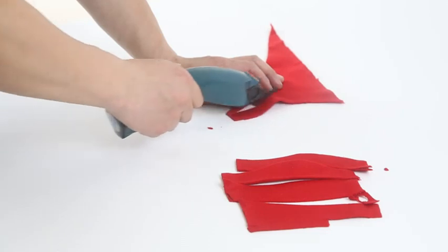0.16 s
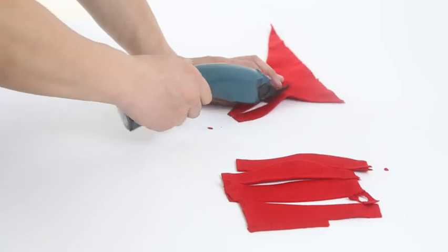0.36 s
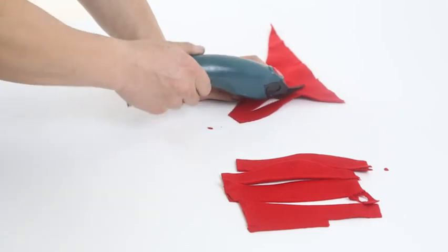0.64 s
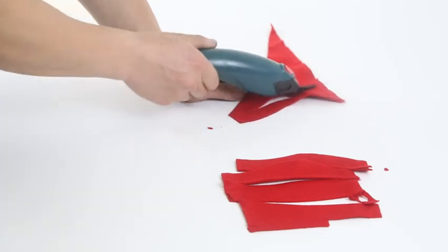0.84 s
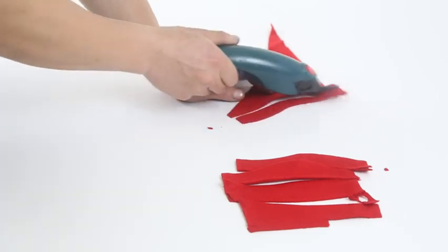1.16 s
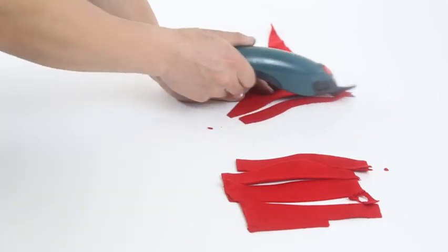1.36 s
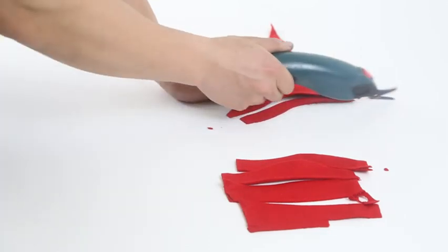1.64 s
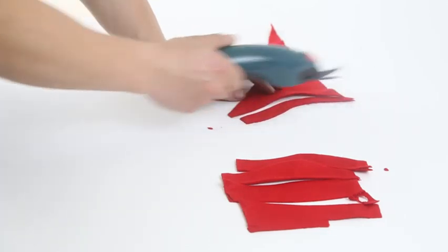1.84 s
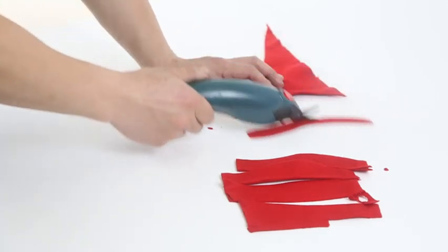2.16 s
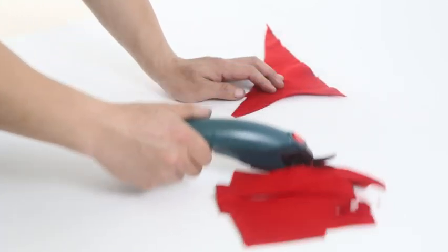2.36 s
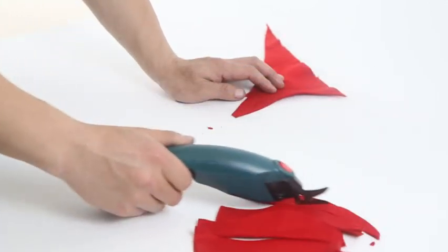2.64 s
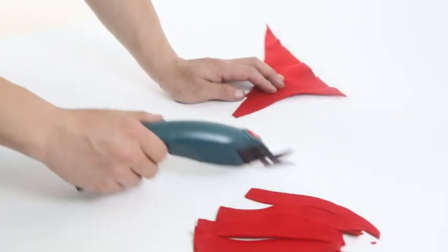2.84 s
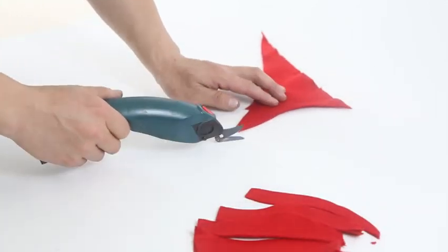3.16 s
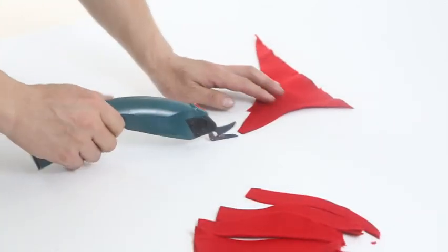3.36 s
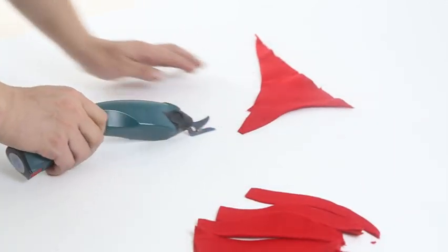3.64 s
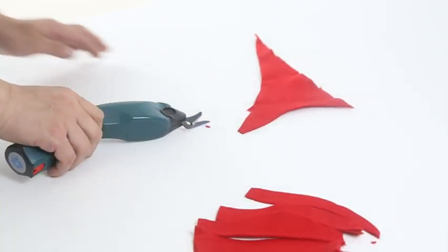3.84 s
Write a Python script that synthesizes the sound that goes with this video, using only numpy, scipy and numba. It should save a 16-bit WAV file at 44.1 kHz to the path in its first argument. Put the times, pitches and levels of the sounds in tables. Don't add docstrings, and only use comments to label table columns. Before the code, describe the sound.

Electric scissors buzz harshly while cutting cloth on a table, then wind down to quiet.

```python
import sys
import numpy as np
from scipy import signal
from scipy.fft import rfft, irfft
from scipy.io import wavfile
from scipy.ndimage import uniform_filter1d
from numba import njit

SR = 44100
rng = np.random.default_rng(int(sys.argv[2]) if len(sys.argv) > 2 else 0)


def put_to_file(sound):
    columns = np.atleast_2d(sound).T
    safe = np.clip(columns, -1, 1)
    whole_steps = np.round(safe * 32767)
    wavfile.write(sys.argv[1], SR, whole_steps.astype(np.int16))


def volts_from_db(level):
    exponent = np.asarray(level, float) / 20
    return 10 ** exponent


N = 176400

# (time [s], speed [strokes/s])
STROKE_SPEED = [(0.0, 59.75), (0.5, 59.96), (0.9, 60.15), (1.2, 59.7), (1.45, 60.1), (1.55, 60.51),
                (1.92, 61.08), (2.0, 50.4), (2.1, 36.42), (2.2, 24.63), (2.3, 15.97), (2.5, 1.15)]
# (time [s], level [dB], brightness [dB])
TOOL_MOVES = [(0, -21, -7.5), (.26, -22, -8.5), (.49, -24.5, -7), (.63, -21.5, -9), (1.17, -22.5, -6.5),
              (1.46, -22, -9), (1.56, -24.5, 2), (1.75, -26.5, 4), (1.95, -24, 3), (2.1, -24.5, 2.5),
              (2.3, -29.5, 1)]
# (time [s], hum level [dB])
TABLE_PRESS = [(0.0, -32), (0.046, -29.5), (0.582, -33), (1.178, -34.5), (1.5, -43), (1.618, -47),
               (1.662, -60), (1.7, -62)]
# (multiple of stroke rate [-], early level [dB], late level [dB])
TABLE_HUM = [(1, -27, -34), (2, 0.5, 0.5), (3, -8.5, -7.5), (4, -19.5, -32), (5, -15.5, -18.5),
             (6, -25, -23)]
# (multiple of stroke rate [-], first grip [dB], second grip [dB], third grip [dB])
BLADE_TONES = [(6.97, -50, -49, -50.5), (7.94, -52, -48.5, -49), (9.07, -48.5, -43.5, -43),
               (10.23, -68, -50, -48.5), (11.38, -64, -62, -57), (11.97, -46, -43.5, -42),
               (12.7, -51, -55, -44), (14.07, -42, -35, -36), (15.03, -38, -37.5, -34),
               (15.94, -40, -39, -49), (17.05, -36.5, -45.5, -36), (17.9, -49, -50, -49),
               (18.85, -38, -36.5, -34.5), (20, -40, -52, -44), (20.78, -35.5, -38.5, -36.5),
               (21.92, -32, -57, -45), (22.96, -38, -35.5, -31), (24.12, -34, -32.5, -30.5),
               (24.86, -40, -53, -41), (26.12, -41, -41, -35), (26.66, -36, -37, -47),
               (28.14, -58, -63, -37), (29.35, -40, -44, -39), (30, -45, -49, -40), (31.5, -37, -52, -36.5),
               (32, -47, -53, -37.5), (33, -44, -52, -49), (35.15, -38, -51, -40), (35, -40, -42, -41),
               (35, -46, -47, -51), (36.64, -35, -43, -44), (38.45, -38, -40, -37), (39.17, -34, -53, -34),
               (40.55, -32, -37, -45), (41, -43, -39, -36.5), (41.86, -34, -38, -51), (42.8, -44, -38, -49),
               (45.1, -52, -46, -50), (43.9, -48, -43, -42)]
# (pitch [Hz], width [Hz], level [dB])
HOUSING_CUTTING = [(543, 43, -14), (893, 115, -7), (1060, 143, -5.5), (1350, 152, -2.5), (1623, 166, -1.5),
                   (2400, 464, 0.5), (3170, 680, -0.5), (3900, 720, -1.5), (6260, 730, -11),
                   (7400, 620, -7), (9900, 1900, -10.5), (13000, 5000, -18)]
# (pitch [Hz], width [Hz], level [dB])
HOUSING_FREE = [(624, 600, -11.5), (1140, 300, 0), (1650, 290, -3), (2116, 590, -1.6), (2624, 470, 0.5),
                (3094, 400, -2), (3900, 1140, -5), (5280, 3000, -12.5), (6900, 1600, -12.5),
                (8800, 970, -17.5), (10400, 1500, -18), (13500, 5600, -29)]
# (pitch [Hz], width [Hz], level [dB])
STEEL_IN_CLOTH = [(4230, 1500, -5), (6340, 2400, -4.5), (9260, 1540, 5), (11000, 2700, -7),
                  (13400, 2700, -25)]
# (pitch [Hz], width [Hz], level [dB])
STEEL_IN_AIR = [(4240, 880, 4.5), (6500, 2300, 1), (9000, 2500, -10), (12400, 2800, -10)]
# (time [s], peak [dB], pitch [Hz], length [s])
HAND_TICKS = [(3.08, -50, 6000, .004), (3.383, -48, 2500, .003), (3.413, -40, 3000, .004),
              (3.441, -34, 2700, .002), (3.442, -40, 4200, .002), (3.465, -33, 2400, .002),
              (3.54, -41, 7000, .0015), (3.55, -38, 3470, 0.0053), (3.603, -33, 3200, .0018),
              (3.603, -45, 8000, 0.0011), (3.623, -27, 2500, 0.0034), (3.947, -34, 3900, 0.0038),
              (3.942, -44, 13000, .004), (3.945, -32, 9500, 0.0039), (3.946, -40, 7000, 0.0032)]
# (centre time [s], length [s], level [dB], pitch [Hz])
CLOTH_RUSTLE = [(3.13, 0.15, -59, 8981), (3.66, 0.16, -55, 5200), (3.69, 0.12, -58, 5700),
                (2.54, 0.11, -54, 9000), (3.67, 0.044, -50, 2500), (3.8, 0.072, -46.5, 450),
                (3.88, 0.092, -56, 6574)]
# (time [s], peak [dB])
SET_DOWN = [
    (3.621, -29.5),
    (3.717, -19.5),
    (3.726, -19),
    (3.734, -19),
    (3.761, -25),
    (3.793, -22),
    (3.809, -31),
    (3.825, -34),
    (3.869, -38),
    (3.933, -44),
]
# (pitch [Hz], level [dB], time to fade by 60 dB [s])
TABLE_RING = [(147, -2, 0.12), (224, -6.5, 0.13), (301, 6, 0.091), (360, -3, 0.11), (452, -2.5, 0.099),
              (544, -9, 0.099), (620, -16, .07)]
# (pitch [Hz], level per Hz [dB])
ROOM_NOISE = [(15, -47), (25, -17), (91, -1.5), (388, -4.5), (868, -8.5), (1700, -16), (2220, -14),
              (9000, -41.5), (15400, -46)]

OPEN_CUT, OPEN_FREE = .61, .54


def level(x, db):
    return x * volts_from_db(db) / np.sqrt(np.mean(x ** 2))


def curve(table, count=1):
    rows = np.array(table, float)
    return np.interp(np.arange(N) / SR, rows[:, 0], rows[:, count])


def ramp(centre_s, length_s):
    return np.clip((np.arange(N) / SR - centre_s) / length_s + .5, 0, 1)


def band(x, hz, width):
    return signal.lfilter(*signal.iirpeak(min(hz, .45 * SR), hz / max(width, 5), fs=SR), x)


def walk(rate):
    step = int(SR / rate)
    points = rng.standard_normal(N // step + 2)
    joined = np.interp(np.arange(N) / step, np.arange(N // step + 2), points)
    return 1.3 * uniform_filter1d(joined, step)


def scissors():
    turns, speed = crank()
    free = ramp(1.5, 0.054)
    opening = turns - OPEN_CUT - free * (OPEN_FREE - OPEN_CUT)
    shut = blows(turns, -1)
    opens = blows(opening, 0)
    mid = blows(turns - .3, -15) * volts_from_db(free * -18)
    body = clatter(shut + opens + mid, turns, speed, free)
    tick = blade_ticks(shut, opens, mid, speed, free)
    steady = table_hum(turns) + blade_tones(turns, speed)
    return (level(body, -4.0) + tick) * volts_from_db(curve(TOOL_MOVES)), steady


def crank():
    shut_at_s, full_hz = 1.9302, 60.
    hz = np.maximum(curve(STROKE_SPEED), 1e-3)
    turns = np.cumsum(hz) / SR
    return turns - turns[int(shut_at_s * SR)], hz / full_hz


def blows(turns, db):
    scatter_db, jitter_s = 1.3, .00006
    whole = np.arange(np.ceil(turns[0]), turns[-1])
    chance = rng.standard_normal((200, 2))[:len(whole)]
    at = np.interp(whole, turns, np.arange(N)) + jitter_s * SR * chance[:, 0]
    at = np.clip(at, 0, N - 2)
    size = volts_from_db(db + scatter_db * chance[:, 1])
    out, i = np.zeros(N), at.astype(int)
    out[i] += size * (1 - at + i)
    out[i + 1] += size * (at - i)
    return out


def clatter(hits, turns, speed, free):
    clack = signal.lfilter(*signal.butter(2, [1510, 4210], "band", fs=SR), hits)
    clack = level(clack, -12) * volts_from_db(free * 4) * speed ** 0.32
    rattle = rng.standard_normal(N) * volts_from_db(2.5 * walk(400) + 1.4 * walk(90))
    drive = clack + level(rattle, 3.5) * speed ** 0.62
    low = signal.lfilter(*signal.butter(1, 4700, fs=SR), drive)
    slide_db = 2.5 * np.cos(2 * np.pi * (turns - 0.14))
    treble = volts_from_db(curve(TOOL_MOVES, count=2) + slide_db) * speed ** 0.53
    drive = low + (drive - low) * treble
    return np.sqrt(1 - free) * housing(drive, HOUSING_CUTTING) + np.sqrt(free) * housing(drive, HOUSING_FREE)


def housing(x, table):
    out = 0
    for k, (hz, width, db) in enumerate(table):
        out = out + (-1) ** k * volts_from_db(db + .7 * walk(6.94)) * band(x, hz, width)
    return out


def blade_ticks(shut, opens, mid, speed, free):
    cut_db, free_db = -8, -12.5
    in_cloth = steel(shut + volts_from_db(-2.5) * (opens + mid) * (1 - free), STEEL_IN_CLOTH)
    tick = level(in_cloth + steel(opens * free, STEEL_IN_AIR), cut_db)
    return tick * volts_from_db(free * (free_db - cut_db) + curve(TOOL_MOVES, count=2)) * speed ** 1.2


def steel(hits, table):
    scrape_s = 0.00088
    scrape = np.convolve(hits, np.hanning(int(2 * scrape_s * SR)), "same") * rng.standard_normal(N)
    hit = (hits + .5 * scrape / np.sqrt(scrape_s * SR)) * volts_from_db(.3 * walk(150))
    out = 0
    for k, (hz, width, db) in enumerate(table):
        out = out + (-1) ** k * volts_from_db(db) * band(band(hit, hz, 1.27 * width), hz, 1.27 * width)
    return out


def tone(multiple, turns, db):
    start = 1.1 * rng.standard_normal()
    return np.sqrt(2) * volts_from_db(db) * np.cos(2 * np.pi * round(multiple) * (turns - OPEN_CUT) + start)


def first_turn():
    return ramp(.55, .3)


def table_hum(turns):
    turned, hum = first_turn(), 0
    for multiple, early, late in TABLE_HUM:
        hum = hum + tone(multiple, turns, early + turned * (late - early) + walk(4.8))
    touching = np.arange(N) / SR < TABLE_PRESS[-1][0]
    return hum * volts_from_db(curve(TABLE_PRESS)) * touching


def blade_tones(turns, speed):
    turned, again, tones = first_turn(), ramp(1.15, .3), 0
    for multiple, first, second, third in BLADE_TONES:
        db = first + turned * (second - first) + again * (third - second)
        tones = tones + tone(multiple, turns, db + 2.2 * walk(6.22))
    unloading_db = -9 * ramp(1.645, 0.44)
    return tones * volts_from_db(22 + unloading_db + curve(TOOL_MOVES)) * speed ** 8


def hands():
    return ticks() + rustle() + knocks()


def ticks():
    t, out = np.arange(N) / SR, 0
    for at, db, hz, length in HAND_TICKS:
        burst = rng.standard_normal(N) * (t > at) * np.exp(-np.abs(t - at) / length)
        burst = band(band(burst, hz, .65 * hz), hz, .65 * hz)
        out = out + volts_from_db(db + 1.0) * burst / np.abs(burst).max()
    return out


def rustle():
    t, out = np.arange(N) / SR, 0
    for at, length, db, hz in CLOTH_RUSTLE:
        grain = rng.standard_normal(N) * volts_from_db(1.5 * walk(40))
        rub = level(band(band(grain, hz, 1.7 * hz), hz, 1.7 * hz), db)
        out = out + rub * np.exp(-.5 * ((t - at) / length) ** 2)
    return out


def knocks():
    t, push, push_s = np.arange(N) / SR, 0, 0.001
    for at, db in SET_DOWN:
        push = push + volts_from_db(db) * np.sin(np.pi * np.clip((t - at) / push_s, 0, 1))
    t, ring = t[:SR // 2], 0
    for hz, db, t60 in TABLE_RING:
        ring = ring + volts_from_db(db) * np.sin(2 * np.pi * hz * t) * 1000. ** (-t / t60)
    knock = signal.fftconvolve(push, ring / np.abs(ring).max())[:N] * 2 / (push_s * SR)
    return signal.lfilter(*signal.butter(2, 110, "high", fs=SR), knock)


def bare_room(x):
    t60_s, damp = 1.35, .16
    lags = np.array([709, 947, 1193, 1429, 1693, 1979, 2293, 2617])
    return walls(x + 1e-18, lags, volts_from_db(-60 * lags / SR / t60_s), damp)


@njit
def walls(x, lags, gain, damp):
    line, soft, out = np.zeros((8, 4096)), np.zeros(8), np.zeros(len(x))
    for i in range(len(x)):
        total = 0.
        for k in range(8):
            soft[k] += (1 - damp) * (gain[k] * line[k, (i - lags[k]) & 4095] - soft[k])
            total += soft[k]
            out[i] += soft[k] * (1 - 2 * (k % 2))
        for k in range(8):
            line[k, i & 4095] = x[i] + soft[k] - total / 4
    return out


def air():
    out, rows, swell = 0, np.array(ROOM_NOISE), walk(1.024)
    f = np.fft.rfftfreq(N, 1 / SR) + 1e-3
    colour = volts_from_db(np.interp(np.log(f), np.log(rows[:, 0]), rows[:, 1]))
    shaped = rfft(rng.standard_normal(N)) * colour
    for k in range(-1, 21):
        share = np.cos(np.pi / 2 * np.clip(2 * np.log2(f / 20) - k, -1, 1))
        out = out + irfft(shaped * share ** 2, N) * volts_from_db(0.23 * swell + 0.72 * walk(8.27))
    return level(out, -38)


def whine():
    return np.sqrt(2) * volts_from_db(-52) * np.sin(2 * np.pi * 15684 * np.arange(N) / SR)


def scene():
    body, steady = scissors()
    small = hands()
    room = bare_room(body + volts_from_db(-9) * small)
    return (body + small + volts_from_db(-11) * room + steady + air() + whine())[None]


def low_pass(x):
    return signal.sosfilt(signal.butter(12, 17040, fs=SR, output="sos"), x)


def record(dry):
    top_hz = 15760
    mix = signal.sosfilt(signal.ellip(10, .5, 70, top_hz, fs=SR, output="sos"), dry)
    return low_pass(mix)


dry = scene()
out = record(dry)
put_to_file(out)
```